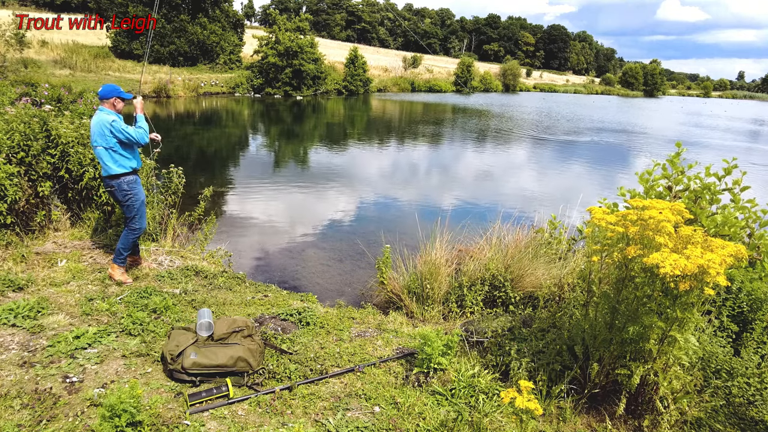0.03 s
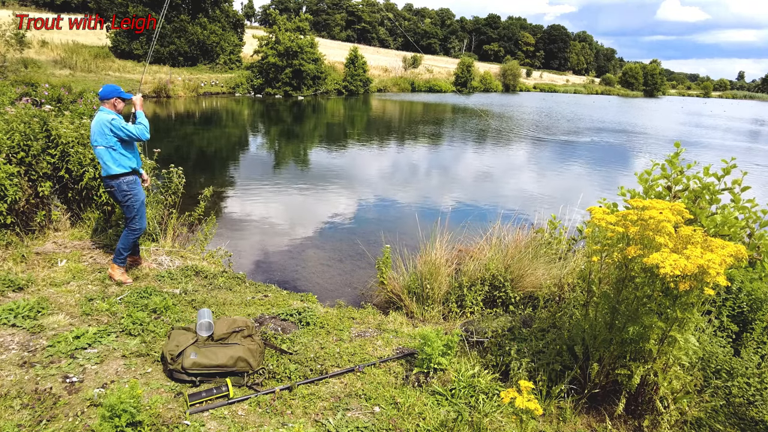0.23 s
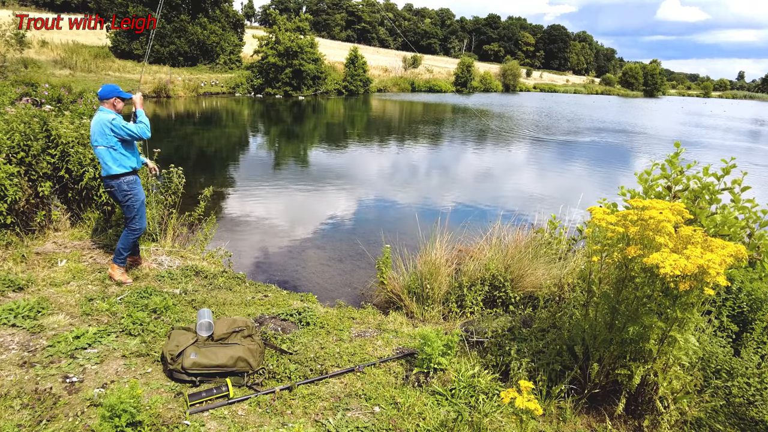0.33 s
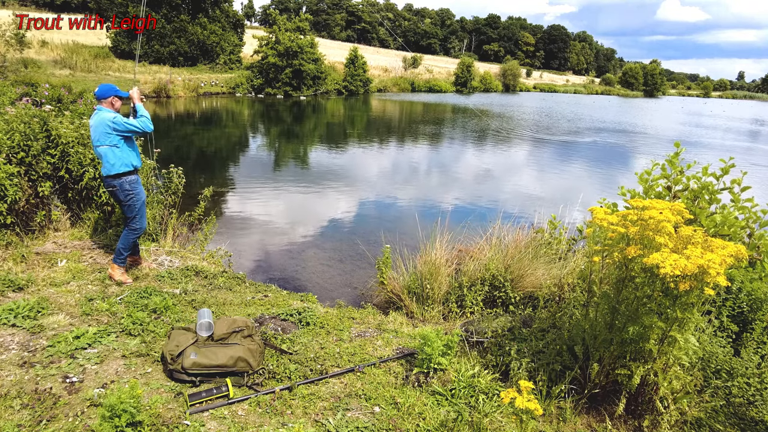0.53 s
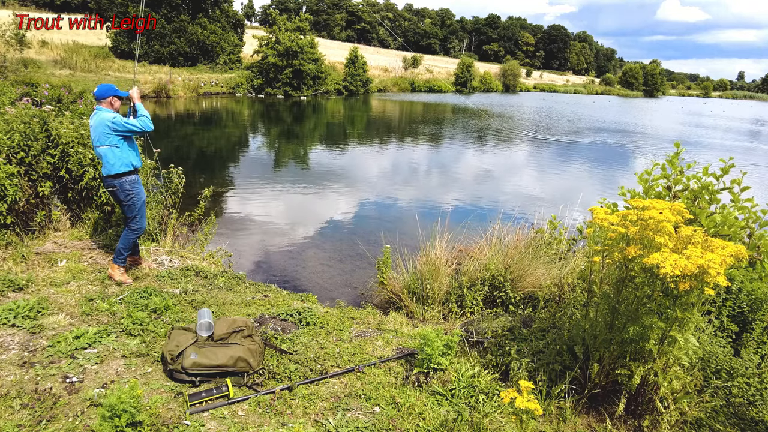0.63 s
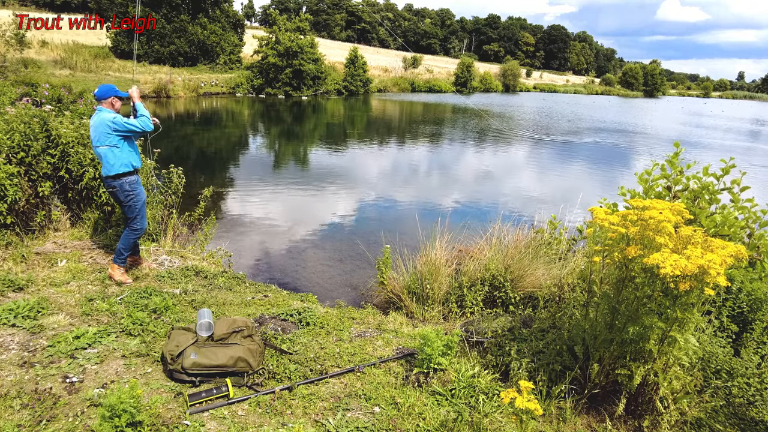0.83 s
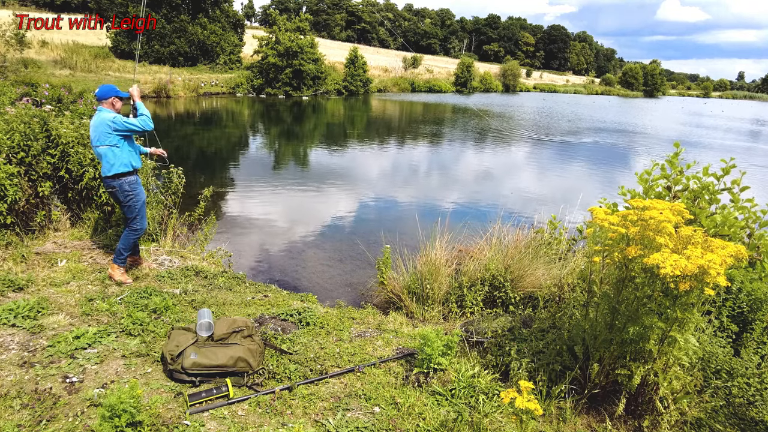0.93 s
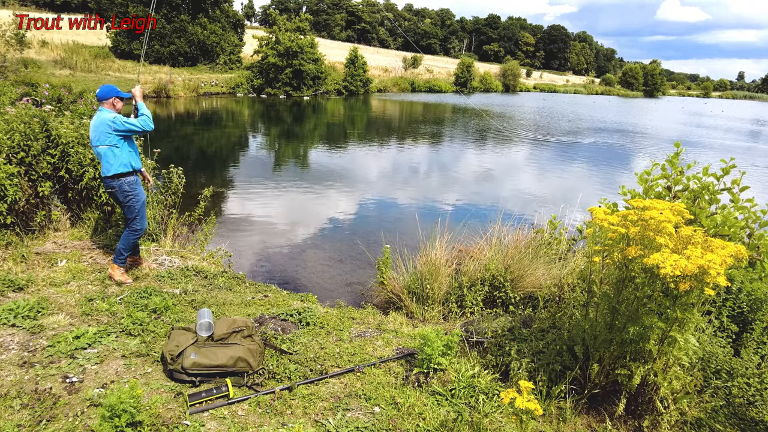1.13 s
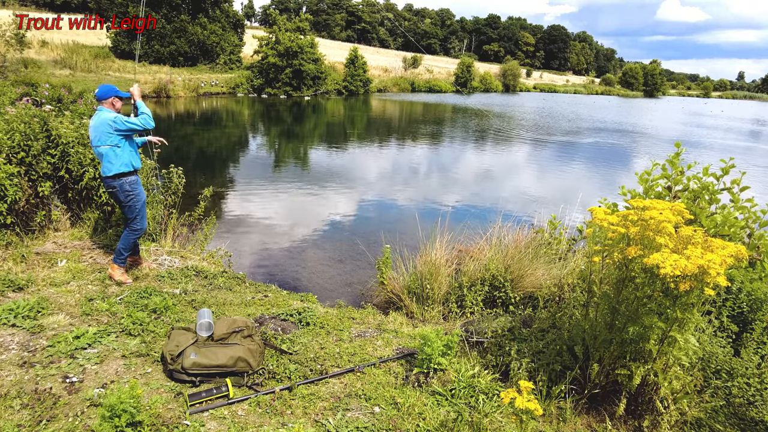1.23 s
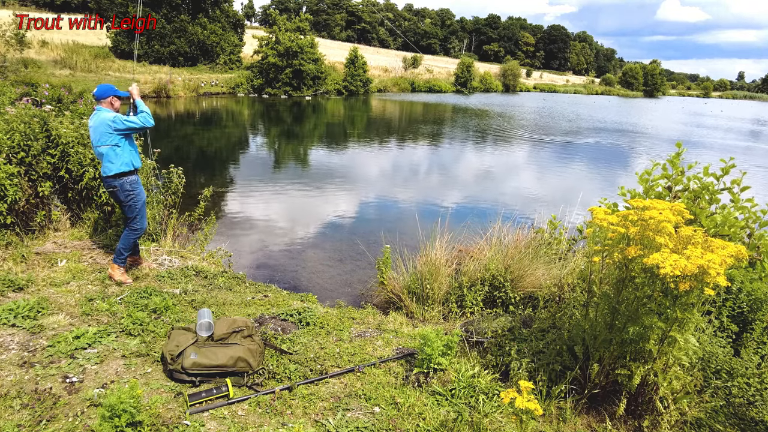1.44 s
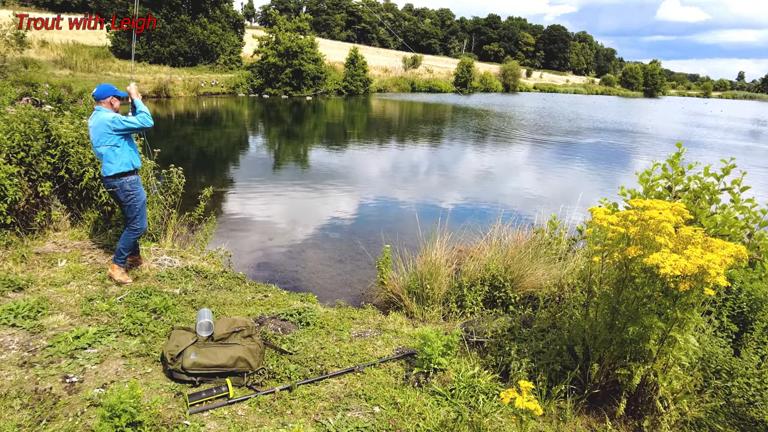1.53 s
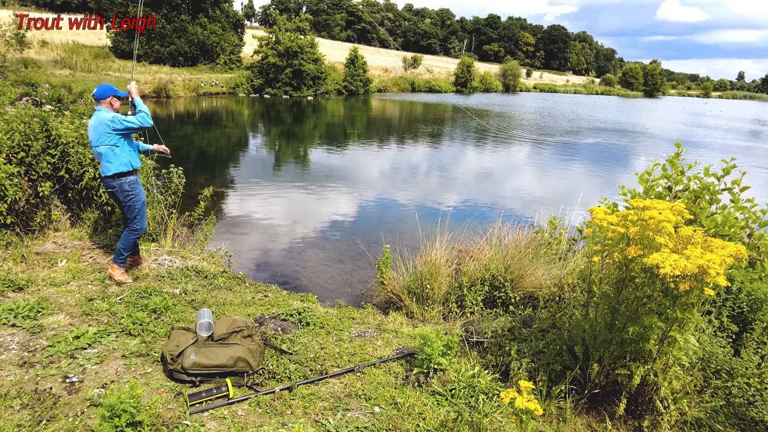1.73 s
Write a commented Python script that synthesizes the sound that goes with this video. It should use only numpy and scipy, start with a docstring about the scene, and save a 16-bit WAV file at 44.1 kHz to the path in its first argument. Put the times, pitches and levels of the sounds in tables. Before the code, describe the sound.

A fly line rasps softly through the rod rings at the start, around 0.6 seconds and around 1.5 seconds. A jacket rustles against the microphone throughout, with a loud crackling flap at about 0.25 seconds and lighter clicks later. To the right, a small bird whistles quick notes and three slurs until 1.3 seconds, echoing faintly. Soft open air, a distant hum and very high, fast ticking lie behind.

```python
"""A fly line rasps through the rod rings in three swishes as an angler casts on a lake bank.
The microphone is on his jacket: right against it, cloth rustles with each arm stroke and flaps once.
Off to the right a small bird whistles quick notes and slurs, echoing faintly from the trees.
Behind lie soft open air, a distant hum and a fast, very high ticking in the hiss."""
import sys
import numpy as np
from scipy import signal
from scipy.fft import rfft, irfft, next_fast_len
from scipy.io import wavfile
from scipy.ndimage import uniform_filter1d, map_coordinates

SR = 44100
rng = np.random.default_rng(int(sys.argv[2]) if len(sys.argv) > 2 else 0)


def wav_out(sig):
    """Save sig, one row per channel (or a flat mono array), as 16-bit PCM at SR to the path in sys.argv[1]."""
    wavfile.write(sys.argv[1], SR, np.round(np.clip(np.atleast_2d(sig).T, -1, 1) * 32767).astype(np.int16))


N = 79380


def amp(db):
    """Decibels to gain."""
    return 10 ** (np.asarray(db) / 20)


def unit(x):
    """Scale to rms 1."""
    return x / np.sqrt(np.mean(x ** 2) + 1e-20)


def clock():
    """The time of every sample."""
    return np.arange(N) / SR


def along(points, hz):
    """(Hz, value) points on a log axis."""
    f, v = np.transpose(points)
    return np.interp(np.log(hz + 1), np.log(f + 1), v)


def curve(rows):
    """(s, value) points joined by lines."""
    return np.interp(clock(), *np.transpose(rows))


def wobble(rate):
    """A smooth random curve, rate knots a second."""
    return map_coordinates(rng.standard_normal(N), [clock() * rate], mode="mirror")


def filtered(x, response):
    """x times a response of frequency."""
    m = next_fast_len(N + SR // 2, True)
    return irfft(rfft(x, m) * response(np.fft.rfftfreq(m, 1 / SR)), m)[..., :N]


def coloured(x, spectrum, size=4096):
    """Causal filter with the gain of the (Hz, dB) points."""
    cep = irfft(np.log(amp(along(spectrum, np.fft.rfftfreq(size, 1 / SR)))))
    cep[1:size // 2] *= 2
    cep[size // 2 + 1:] = 0
    return signal.fftconvolve(x, irfft(np.exp(rfft(cep))))[:N]


def noise(spectrum):
    """Coloured noise of rms 1."""
    return unit(coloured(rng.standard_normal(N), spectrum))


def resonance(f, hz, width_hz):
    """Response of one resonance."""
    return 1j * f * width_hz / (hz * hz - f * f + 1j * f * width_hz)


def swells(rows):
    """Bell-shaped envelopes from (s, dB, half length s) rows."""
    return sum(amp(db) * np.exp(-.5 * ((clock() - s) / half) ** 2) for s, db, half in rows)


def resonate(x, modes):
    """x through (frequency [Hz], width [Hz], gain [dB]) resonances, at rms 1."""
    return unit(filtered(x, lambda f: sum(amp(db) * resonance(f, hz, width) for hz, width, db in modes)))


# the line running through the rings, close to the microphone (time [s], relative level [dB])
LINE_RUN = [(0, -37.5), (.012, -46), (.028, -52.5), (.065, -57), (.105, -46), (.125, -48), (.145, -96),
            (.48, -56.5), (.55, -44.5), (.6, -41), (.635, -37.5), (.725, -39.5), (.79, -51.5), (.83, -83),
            (1.28, -57), (1.385, -47), (1.495, -42), (1.56, -49.5), (1.61, -53), (1.66, -74), (1.8, -85)]
# resonances of the rasping line (frequency [Hz], width [Hz], gain [dB])
RASP_MODES = [(2660, 80, -4), (3450, 150, -16), (3900, 140, 0)]
# colour of the friction that drives them (frequency [Hz], gain [dB])
FRICTION_COLOUR = [(300, -34), (1500, -12), (2600, 1.5), (4100, -0.5), (5500, -1.5), (9000, -13),
                   (16000, -17)]
# colour of the broad rush at speed (frequency [Hz], gain [dB])
RUSH_COLOUR = [(1500, -27), (2400, -33), (2800, -5.5), (3500, 8), (4100, -3), (4500, -18), (6500, -31),
               (16000, -70)]
# the taut line's lower ring after the first sharp pull (time [s], level [dB])
TAUT_RING = [(0, -45), (.05, -56), (.12, -56), (.16, -80)]
def fly_line(chatter_db=1.0, rush_growth=1.17, taut_hz=1665, taut_width_hz=53):
    """Friction in the rings drives resonances and broadens to a rush; the taut line rings at first."""
    run_db = curve(LINE_RUN)
    top_db = run_db.max()
    rasp = resonate(noise(FRICTION_COLOUR), RASP_MODES) * amp(run_db - 2.5)
    rush = noise(RUSH_COLOUR) * amp(top_db - 6 + rush_growth * (run_db - top_db))
    ring = resonate(rng.standard_normal(N), [(taut_hz, taut_width_hz, 0)]) * amp(curve(TAUT_RING))
    return (rasp + rush) * amp(chatter_db * wobble(140)) + ring


# arm strokes rubbing the jacket, right at the microphone (time [s], level [dB])
ARM_STROKES = [(0, -50), (.06, -52), (.14, -53), (.165, -43.5), (.22, -43), (.295, -40.5), (.335, -44.5),
               (.39, -41), (.43, -47.5), (.465, -55), (.535, -43.5), (.56, -42), (.6, -47), (.665, -42.5),
               (.73, -47.5), (.79, -53.5), (.825, -57.5), (.9, -54), (.935, -56), (.965, -54.5),
               (1.072, -42), (1.1, -44.5), (1.13, -41.5), (1.16, -48.5), (1.21, -45), (1.245, -60),
               (1.3, -51), (1.337, -43.5), (1.355, -46.5), (1.43, -45.5), (1.5, -43.5), (1.56, -50),
               (1.66, -58), (1.8, -60)]
# colour of the sliding cloth (frequency [Hz], gain [dB])
CLOTH_COLOUR = [(30, -6), (70, -1.5), (150, -4.5), (300, 1.5), (600, -4), (1400, -1), (2100, -5),
                (4000, -7), (7000, -14), (10000, -18), (13000, -16), (16000, -23)]
def jacket_rustle(catches_per_s=1400, catch_share=.31, spread_db=3, flutter_db=1.3):
    """Cloth slides on cloth: smooth friction and many tiny catches."""
    catches = (rng.random(N) < catches_per_s / SR) * np.sign(rng.standard_normal(N))
    catches *= amp(spread_db * rng.standard_normal(N))
    friction = np.sqrt(catch_share) * unit(catches) + np.sqrt(1 - catch_share) * rng.standard_normal(N)
    return unit(coloured(friction, CLOTH_COLOUR)) * amp(curve(ARM_STROKES) + flutter_db * wobble(69.68))


# colour of the air over the lake (frequency [Hz], gain [dB])
AIR_COLOUR = [(30, -9), (70, -16.5), (150, -6), (240, -6.5), (400, -4.5), (900, -6.5), (1400, -13.5),
              (2200, -20.5), (5000, -27), (11800, -24.5), (14600, -16.5), (15800, -17)]
# a hum far from the bank (frequency [Hz], width [Hz], gain [dB])
HUM_MODES = [(160, 7.4, -3), (227.6, 8.2, 8)]
def lake_air(air_db=-52.5, hum_db=-64):
    """Steady open air, with a faint hum in two narrow bands of noise."""
    hum = resonate(rng.standard_normal(N), HUM_MODES)
    return amp(air_db) * noise(AIR_COLOUR) + amp(hum_db) * hum


# resonance of the bird's throat (frequency [Hz], gain [dB])
THROAT_GAIN = [(2200, -41), (2600, -7.5), (3100, -0.5), (3600, -8.5), (4500, -12), (5000, -11)]
def whistle(pitch, start, end, db, waver=.0065, fade_s=.0062):
    """One clean note, loudest where it meets the throat's resonance."""
    t = clock()
    gate = np.clip(np.minimum(t - start, end - t) / fade_s, 0, 1)
    phase = 2 * np.pi * np.cumsum(pitch * (1 + waver * wobble(400))) / SR
    return gate * amp(db + along(THROAT_GAIN, pitch)) * np.sqrt(2) * np.sin(phase)


# quick notes, off to the right (level before the throat [dB], points of (time [s], pitch [Hz]))
BIRD_NOTES = [ (-45.5, [(0, 3050), (.012, 3290), (.033, 4750), (.046, 3600), (.06, 2400)]),
              (-46.5, [(.12, 2480), (.148, 2980), (.167, 3020), (.2, 2980), (.213, 3130), (.228, 4300)]),
              (-49, [(.315, 3080), (.328, 3000), (.34, 2400)]), (-46, [(.346, 2260), (.36, 3180),
              (.373, 3620), (.388, 3540), (.402, 4800)]), (-50, [(1.185, 2480), (1.215, 2780),
              (1.226, 3120), (1.237, 4450), (1.245, 3310), (1.255, 2780), (1.275, 2340)]), ]
# down-and-up slurs (start [s], length [s], lowest pitch [Hz], level before the throat [dB])
BIRD_SLURS = [(0.432, 0.17, 2620, -45), (0.676, .16, 2663, -47.5), (0.917, .178, 2550, -47.5)]
def bird(right_db=4, left_lead_s=.000024, echo_db=-16, echo_t60_s=.31):
    """A small bird whistles quick notes and three alike slurs; the trees return a faint echo."""
    t, song = clock(), np.zeros(N)
    for db, points in BIRD_NOTES:
        pitch = uniform_filter1d(curve(points), size=180)
        song += whistle(pitch, points[0][0], points[-1][0], db)
    for start, length, low_hz, db in BIRD_SLURS:
        progress = np.clip((t - start) / length, 0, 1)
        dip = 1.6 * (progress - .48) ** 2
        final_flick = .373 * progress ** 13.5
        song += whistle(low_hz * (1 + dip + final_flick), start, start + length, db)
    # louder on the right, a touch earlier on the left
    pan = amp([[-right_db / 2], [right_db / 2]])
    direct = filtered(song, lambda hz: pan * np.exp(1j * np.pi * left_lead_s * np.outer([1, -1], hz)))
    tail = rng.standard_normal((2, N)) * np.exp(-np.log(1000) * t / echo_t60_s)
    echo = signal.fftconvolve(song[None], tail / np.linalg.norm(tail[0]), axes=1)[:, :N]
    return direct + amp(echo_db) * echo


# colour of the ticks in the background hiss (frequency [Hz], gain [dB])
TICK_COLOUR = [(100, -60), (9000, -45), (12500, -22), (13400, -6), (14500, 0), (16000, 0)]
def ticking(rate_hz=76, first_s=.0026, tick_db=-23, scatter_db=2, fizz_db=-50, fizz_decay_s=.0012):
    """Even, very high ticks, each inside a short fizz."""
    times = np.arange(first_s, (N - 1) / SR, 1 / rate_hz)
    strengths = amp(tick_db + scatter_db * rng.standard_normal(len(times)))
    ticks = np.bincount((times * SR).astype(int), strengths, N)
    to_nearest_s = abs(((clock() - first_s) * rate_hz + .5) % 1 - .5) / rate_hz
    fizz = amp(fizz_db) * noise(TICK_COLOUR) * np.exp(-to_nearest_s / fizz_decay_s)
    return coloured(ticks, TICK_COLOUR) + fizz


# folds pressing on the microphone (time [s], level [dB], half length [s])
FOLD_BUMPS = [(.165, -48, 0.014), (.236, -32.5, 0.0055), (0.27, -41, .016), (0.293, -40, 0.01),
              (0.394, -47.5, .03), (0.671, -40.5, 0.0083), (1.458, -40.5, 0.0027), (1.48, -55.5, 0.05)]
# their dull colour (frequency [Hz], gain [dB])
BUMP_COLOUR = [(25, -22), (60, -20), (130, 3), (300, -2), (500, 0), (1000, -25), (3000, -48), (16000, -97)]
def cloth_bumps():
    """Folds of cloth push softly on the microphone in low puffs of noise."""
    return noise(BUMP_COLOUR) * swells(FOLD_BUMPS)


# the jacket striking the microphone
# (time [s], level [dB], thud pitch [Hz], thud t60 [s], crack offset [dB])
JACKET_HITS = [(.227, -11, 1010, 0.0048, -5.5), (0.2316, -15.5, 1120, 0.012, 2.5),
               (.2348, -19, 1280, 0.015, -9), (0.2389, -15, 1170, 0.0086, 2), (0.2547, -4, 827, 0.0086, -6),
               (0.2617, -16, 640, 0.0076, -15), (.268, -11, 464, 0.007, -2), (0.29, -26, 1350, 0.014, 1),
               (0.2912, -13.5, 714, 0.0039, -12), (0.3023, -24, 1130, 0.0074, -16),
               (0.31, -32, 1400, 0.022, -13), (0.7853, -32, 1120, 0.0072, -11),
               (.8983, -30.5, 1040, 0.0032, -21), (0.9232, -37, 900, 0.0055, 0.5),
               (.9405, -33.5, 1640, 0.013, -17), (0.9959, -30, 970, 0.0084, -4.5),
               (1.0717, -39, 1420, 0.003, -8), (1.164, -46.5, 1200, 0.0036, 16.5),
               (1.204, -43, 1000, 0.0032, 13.5), (1.211, -29, 600, .006, 0), (1.3366, -26, 696, 0.004, 0),
               (1.3744, -27, 446, 0.0072, -19)]
# colour of the crack and scuff (frequency [Hz], gain [dB])
CRACK_COLOUR = [(100, -50), (800, -14), (2200, 0.5), (3600, 6.5), (5500, 0.5), (7500, -6), (10000, -11),
                (12500, -6.5), (16000, -9)]
def jacket_knocks(attack_s=.00012, crack_boost_db=8, scuff_db=-18.5, scuff_s=.0013, size=2048):
    """Each contact with the microphone is a crack, a brief scuff and a dead thud."""
    thuds, cracks = np.zeros((2, N + size))
    t = np.arange(size) / SR
    for start, db, hz, t60, crack_db in JACKET_HITS:
        at = round(start * SR)
        envelope = (1 - np.exp(-t / attack_s)) * np.exp(-np.log(1000) * t / t60)
        thuds[at:at + size] += amp(db) * envelope * np.sin(2 * np.pi * hz * t)
        scuff = amp(scuff_db) * np.exp(-t / scuff_s) * rng.standard_normal(size)
        cracks[at:at + size] += amp(db + crack_db + crack_boost_db) * ((t == 0) + scuff)
    return thuds[:N] + coloured(cracks[:N], CRACK_COLOUR)


# the line catching, close by (time [s], pitch [Hz], level [dB], half length [s])
LINE_CATCHES = [(0.429, 11800, -46, 0.0012), (.441, 11800, -48.5, 0.0023), (0.502, 11600, -55, .004)]
def line_squeaks():
    """The line catches for a moment and squeaks very high."""
    return sum(swells([(s, db, half)]) * np.sqrt(2) * np.sin(2 * np.pi * hz * clock())
               for s, hz, db, half in LINE_CATCHES)


# crisp moments in the cloth beside the microphone (time [s], level [dB], half length [s])
CRINKLES = [(.881, -44, 0.00083), (1.125, -45.5, 0.02), (1.336, -51, .003), (1.421, -37.5, 0.00095),
            (1.45, -55, .05)]
# their bright colour (frequency [Hz], gain [dB])
CRINKLE_COLOUR = [(300, -32), (3000, 8), (6000, -27), (9000, -7), (12500, 1), (16000, 3)]
def cloth_crinkles():
    """Stiff cloth gives short bright hisses."""
    return noise(CRINKLE_COLOUR) * swells(CRINKLES)


# close sounds sit a little left, with the hiss near 8.5 kHz almost centred
# (frequency [Hz], left over right [dB])
LEFT_BALANCE = [(60, 3), (3500, 3), (6500, 3), (8500, 0.64), (15000, 2.5)]
def scene(low_cut_hz=80, overload=.55):
    """From the jacket: all but the bird passes a low cut and soft overload and sits a little left."""
    bank = fly_line() + jacket_rustle() + lake_air() + ticking()
    bank += cloth_bumps() + jacket_knocks() + line_squeaks() + cloth_crinkles()
    bank = signal.sosfilt(signal.butter(2, low_cut_hz, "highpass", fs=SR, output="sos"), bank)
    bank = bank / (1 + (bank / overload) ** 4) ** .25
    return filtered(bank, lambda hz: amp(np.outer([.5, -.5], along(LEFT_BALANCE, hz)))) + bird()


def record(dry, top_hz=15850):
    """Nothing is kept above the band limit."""
    return filtered(dry, lambda hz: hz < top_hz)


dry = scene()
out = record(dry)
wav_out(out)
```